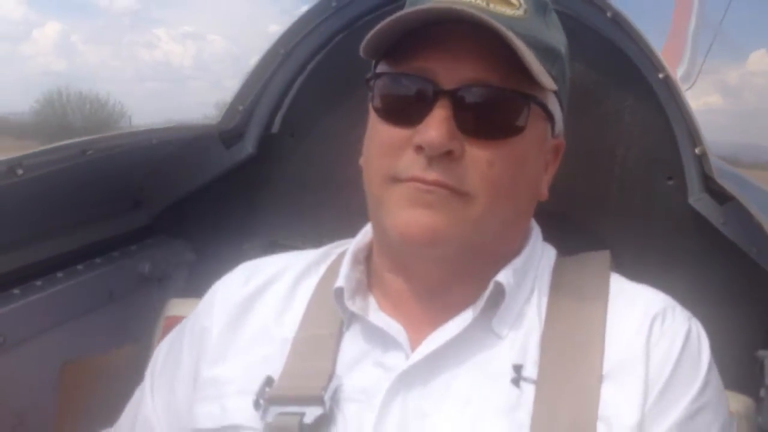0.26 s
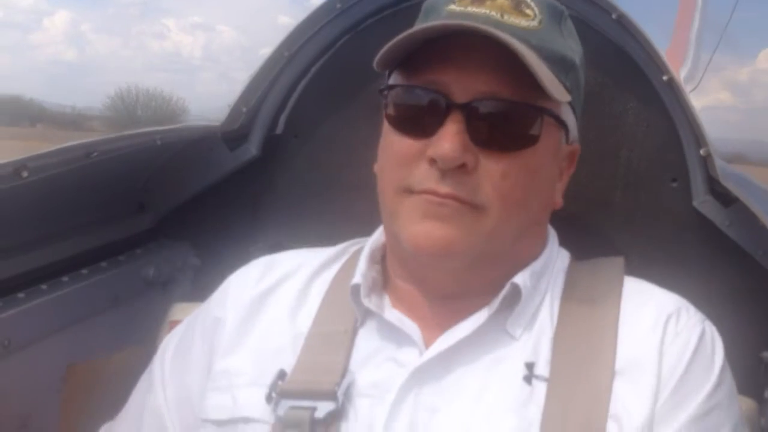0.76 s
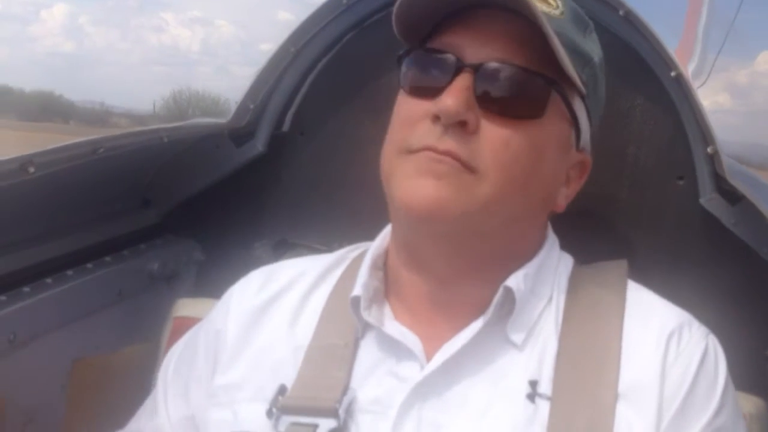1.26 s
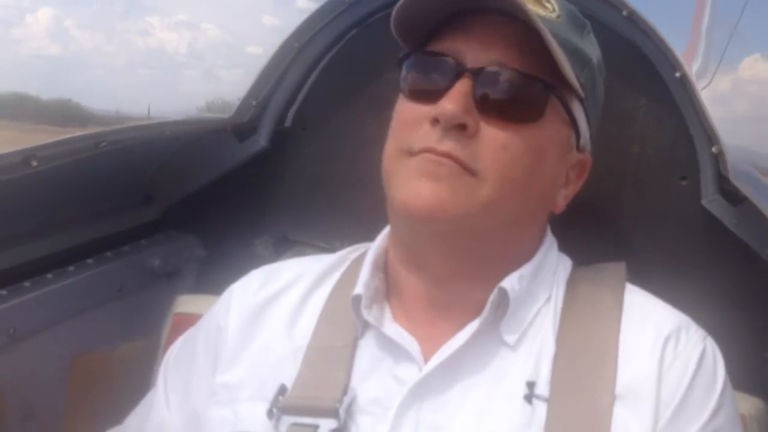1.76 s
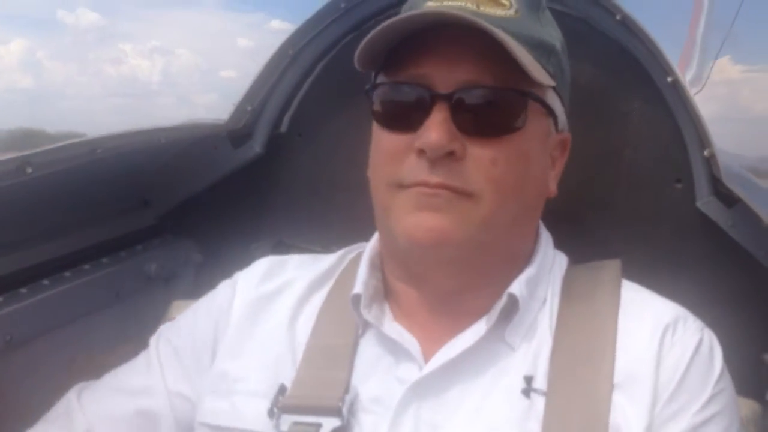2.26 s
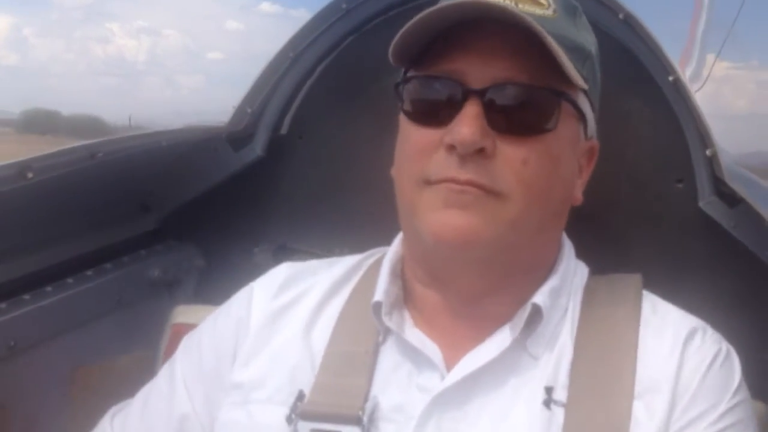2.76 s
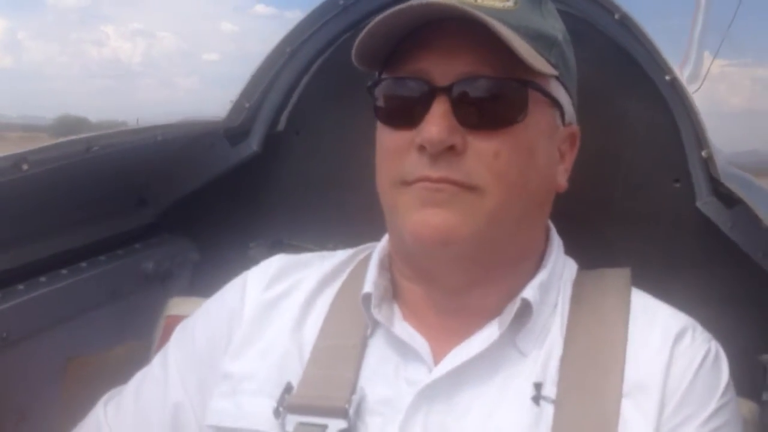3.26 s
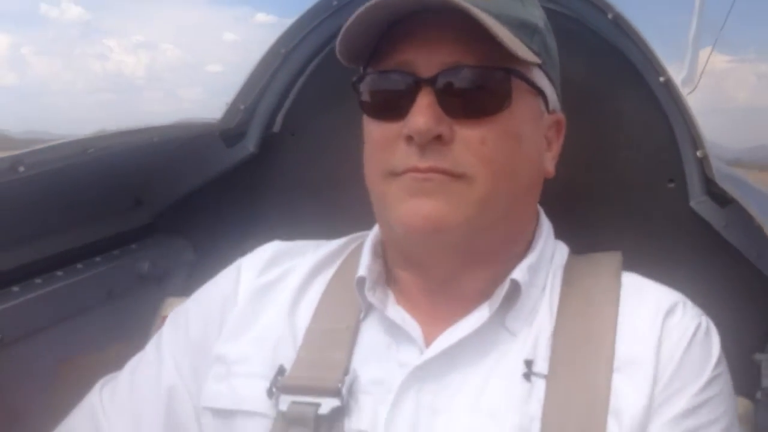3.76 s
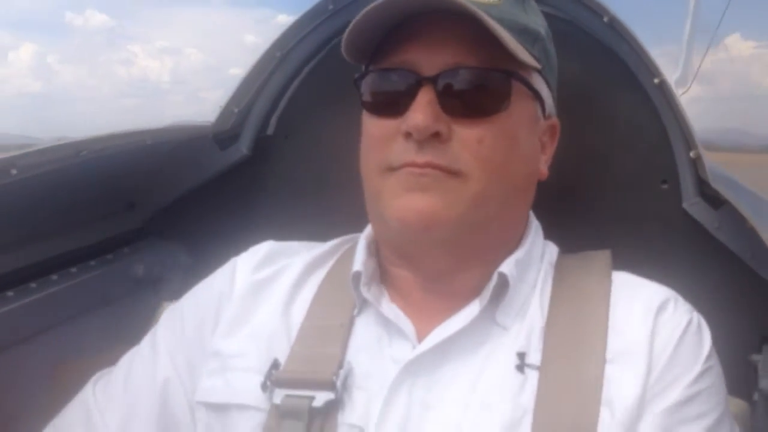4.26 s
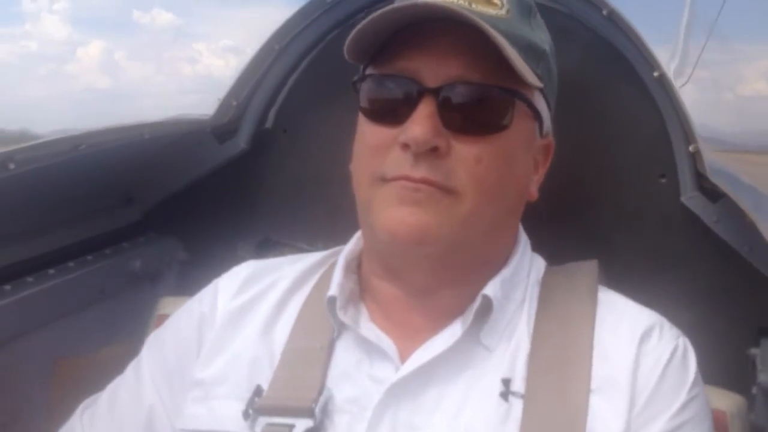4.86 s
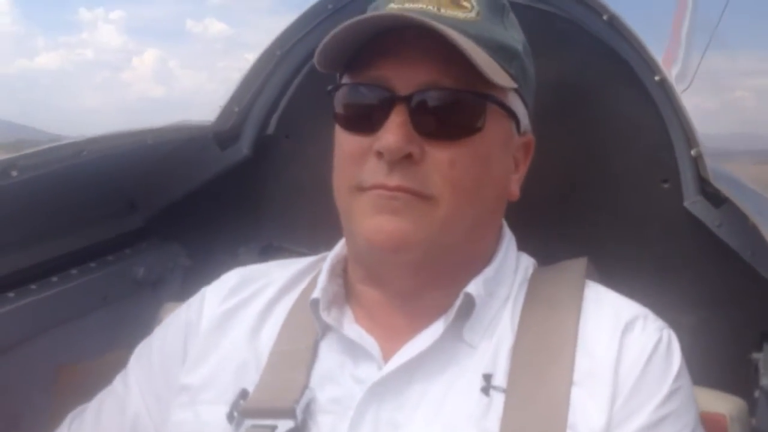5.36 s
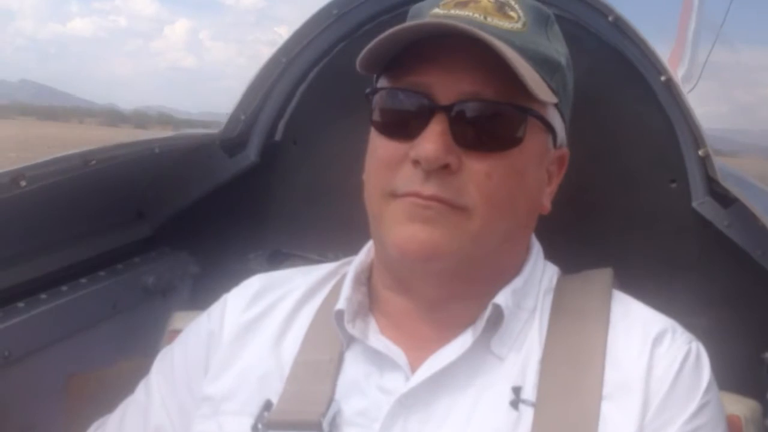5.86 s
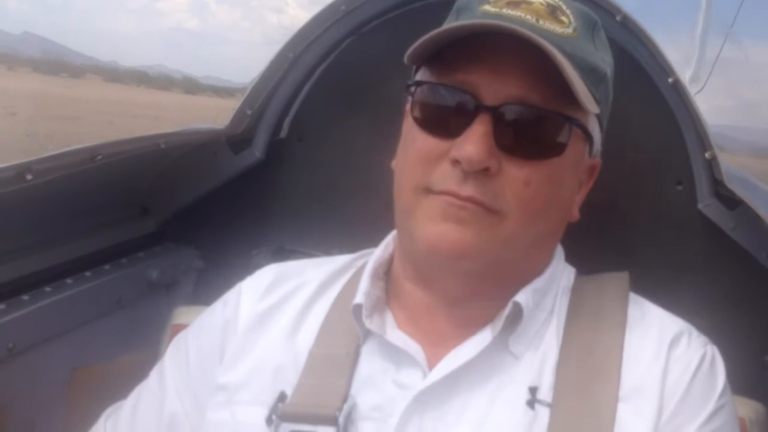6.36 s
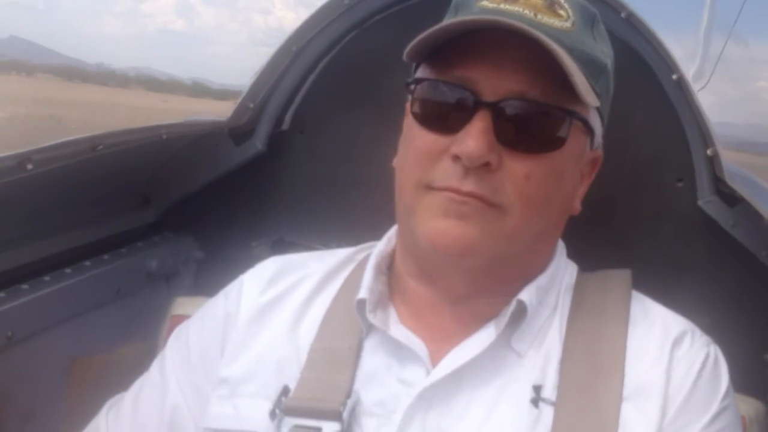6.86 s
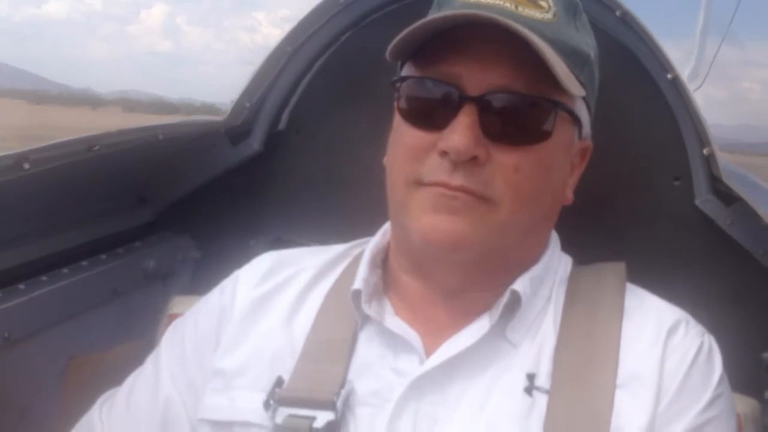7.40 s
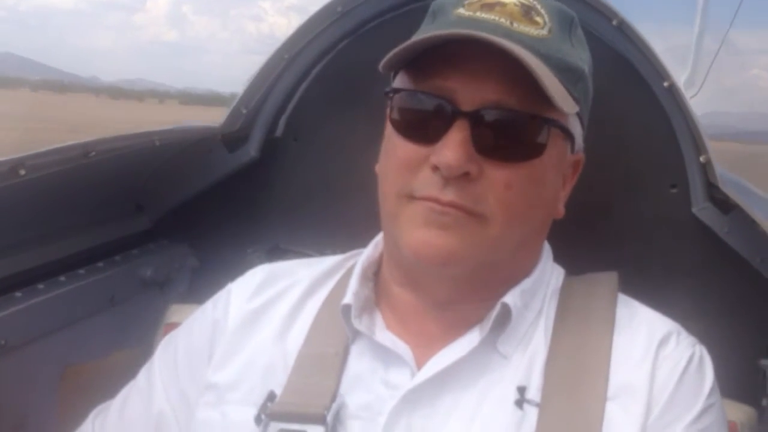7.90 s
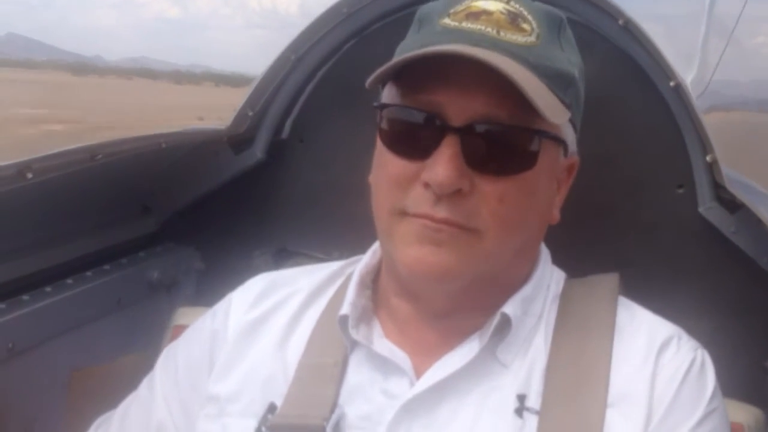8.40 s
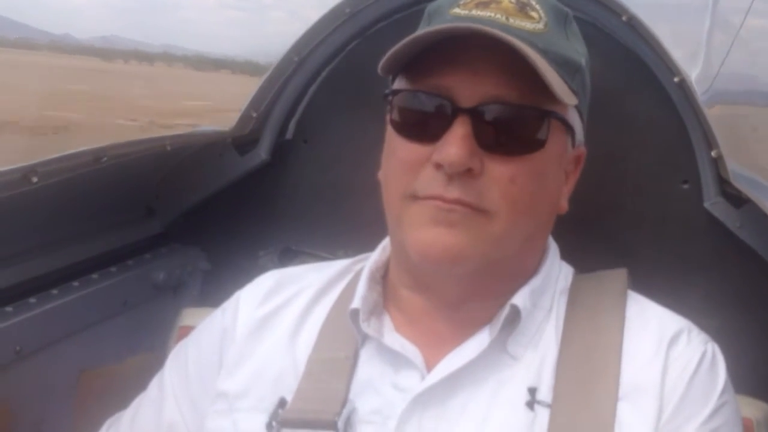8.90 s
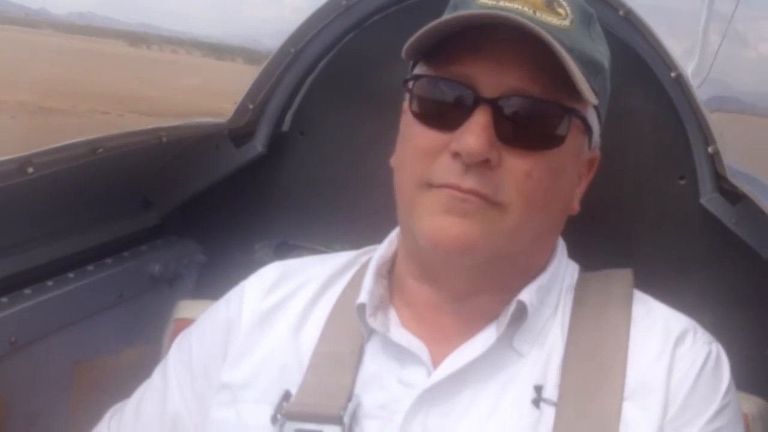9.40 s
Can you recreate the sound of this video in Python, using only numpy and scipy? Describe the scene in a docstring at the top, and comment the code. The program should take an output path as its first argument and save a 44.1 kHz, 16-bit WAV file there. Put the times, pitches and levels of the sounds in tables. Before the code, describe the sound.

Heard close up inside a glider cockpit. From 0 s a loud, low, hollow rumble is already under way as the wheel drums the fuselage over rough dirt, surging unevenly with each bump, over gritty grinding. In the first four seconds there are light buckle taps, sparse metallic rattles and faint very deep thumps, the strongest near 2.1 s. From about 4.1 s stony ground brings dense, bright clattering of canopy and fittings, and the panels sound harsher as the deepest bass thins. A hard cracking bang rings the frame at 4.8 s, a duller heavy jolt at 6.4 s, another at 7.7 s amid sharp rattles. At 8 s the rumble and grinding stop abruptly. Much quieter low buffeting air with a soft hiss continues to about 9.6 s, with dull hollow airframe clunks near 8.2, 8.7 and 8.8 s and a faint one at 9.1 s.

```python
"""A glider's wheel drums the hollow fuselage on a takeoff roll over rough dirt, heard in the cockpit.
Random impacts ring the hull and panels; shaped noise makes the grinding grit and the rushing air.
Fittings rattle in short noise bursts, smooth pulses make faint, very deep thumps, and three jolts
bang and ring the frame. Near 8 s the wheel leaves the ground: the rumble stops, the airframe clunks
and air rushes past."""
import sys
import numpy as np
from scipy import signal
from scipy.fft import rfft, irfft, next_fast_len
from scipy.io import wavfile
from scipy.ndimage import uniform_filter1d, minimum_filter1d, map_coordinates

SR = 44100
rng = np.random.default_rng(int(sys.argv[2]) if len(sys.argv) > 2 else 0)


def put_to_file(sound):
    """Save the sound as 16-bit audio at rate SR, in the file named by the first command-line argument."""
    columns = np.atleast_2d(sound).T  # one column per channel
    safe = np.clip(columns, -1, 1)
    whole_steps = np.round(safe * 32767)
    wavfile.write(sys.argv[1], SR, whole_steps.astype(np.int16))


N = 425124


def amp(db):
    """Turn decibels into a gain."""
    return 10 ** (np.asarray(db) / 20)


def unit(x):
    """Scale to an average (rms) strength of 1."""
    return x / np.sqrt(np.mean(x ** 2) + 1e-20)


def curves(rows):
    """Join the rows with straight lines over time: one curve for each column after the first."""
    s, *columns = np.transpose(rows)
    return [np.interp(np.arange(N) / SR, s, column) for column in columns]


def wobble(rate):
    """A smooth random curve through `rate` random points a second."""
    points = rng.standard_normal(int(N * rate / SR) + 4)
    return map_coordinates(points, [np.arange(N) * rate / SR])


def filtered(x, response):
    """Multiply each frequency of x by response(hz)."""
    size = next_fast_len(len(x) + 8192)  # spare room for the filter's tail
    hz = np.fft.rfftfreq(size, 1 / SR)
    return irfft(rfft(x, size) * response(hz), size)[:len(x)]


def spectrum_gain(spectrum, hz):
    """Gain at each frequency, read between the (pitch_hz, level_db) points on a log pitch scale."""
    pitch_hz, level_db = np.transpose(spectrum)
    return amp(np.interp(np.log(hz + 1), np.log(pitch_hz), level_db))


def coloured(x, spectrum):
    """Shape the tone of x with a spectrum, then scale it to rms 1."""
    return unit(filtered(x, lambda hz: spectrum_gain(spectrum, hz)))


def recoloured(spectrum, scatter_db):
    """Nudge each level of a spectrum at random, so that no two contacts sound alike."""
    return [(hz, db + scatter_db * rng.standard_normal()) for hz, db in spectrum]


def resonate(x, modes):
    """Ring x through resonances given as (pitch_hz, width_hz, level_db)."""
    def response(f):
        total = 0
        for k, (hz, width, db) in enumerate(modes):
            peak = 1j * f * width / (hz * hz - f * f + 1j * f * width)
            total = total + (-1) ** k * amp(db) * peak  # neighbours have opposite signs
        return total
    return filtered(x, response)


def grains(rate, spread_db):
    """Single-sample impacts at random times, about `rate` a second, of uneven size and random sign."""
    hits = rng.random(N) < rate / SR
    size_db = spread_db * np.clip(rng.standard_normal(N), -2, 2)
    return hits * rng.choice([-1, 1], N) * amp(size_db)


def patter(rate, spread_db, t60):
    """Loudness curve of many small random contacts, each falling 60 dB in t60 seconds."""
    fade = amp(-60 * np.arange(SR // 8) / SR / t60)
    power = signal.fftconvolve(grains(rate, spread_db) ** 2, fade ** 2)[:N]
    return np.sqrt(np.abs(power))


def burst(spectrum, attack, t60, size=6000):
    """One contact: shaped noise that rises over about `attack` seconds and falls 60 dB in t60 seconds."""
    t = np.arange(size) / SR
    gain = spectrum_gain(spectrum, np.fft.rfftfreq(size, 1 / SR))
    noise = unit(irfft(rfft(rng.standard_normal(size)) * gain))
    return noise * (1 - np.exp(-t / attack)) * amp(-60 * t / t60)


def steadied(x, share, size=3000):
    """Even out a share of x's chance surges, so that the ground sets its swells."""
    power = uniform_filter1d(uniform_filter1d(x ** 2, size=size), size=size)
    return unit(x / (np.abs(power) + 1e-9) ** (np.clip(share, 0, 1) / 2))


def add(track, s, sound):
    """Mix a sound into the track at time s."""
    part = track[max(round(s * SR), 0):][:len(sound)]
    part += sound[:len(part)]


def swell(middle, length):
    """A smooth rise from 0 to 1 and back; middle and length are in seconds."""
    out = np.zeros(N)
    size = max(round(length * SR), 3)
    add(out, middle - length / 2, np.hanning(size))
    return out


def speed(liftoff=8):
    """Share of flying speed: a steady climb from 0 to 1 at liftoff (s)."""
    return np.clip(np.arange(N) / SR / liftoff, 0, 1)


def with_speed(level):
    """Level in dB of a sound that grows as the glider gathers speed."""
    start_db, gained_db = level
    return start_db + gained_db * speed()


def on_ground(liftoff=8.02, release=0.16):
    """Ground contact: 1 while rolling, falling to 0 at liftoff as the wings take the weight."""
    return np.clip((liftoff - np.arange(N) / SR) / release, 0, 1)


# swells in the strip that press on the wheel: middle_s, length_s, hull_change_db, panel_change_db
BUMP_SWELLS = [(0.137, 0.11, 3, -3.5), (0.243, .1, -1, 5.5), (0.538, 0.082, 6, 7), (0.847, 0.4, 4, 1.5),
               (1.151, 0.19, 8.5, 2), (1.273, 0.25, 3, 4), (1.471, 0.3, 5.5, 2), (1.679, 0.15, 4, 0.5),
               (2.066, 0.35, 4.5, 3.5), (2.454, 0.38, 1.5, 3), (2.612, 0.15, 4.5, 5), (2.738, 0.15, 4.5, 5),
               (2.904, 0.19, 7, 3.5), (3.141, 0.096, 8.5, 2.5), (3.635, 0.34, 3, 4), (3.718, 0.054, 7, 2),
               (4.011, 0.21, 6.5, 3.5), (4.208, 0.082, 7, 3), (4.532, 0.42, 2, 5), (4.817, 0.26, -1, 5),
               (5.2, 0.33, 0, 3.5), (5.417, 0.33, -2, 5.5), (5.647, 0.32, 4.5, 2), (5.905, 0.24, 0, 3.5),
               (6.496, 0.22, 4, -0.5), (6.924, 0.34, 4, 0), (7.211, 0.11, 6.5, 5.5), (7.677, 0.1, -5.5, 3),
               (7.773, 0.11, 4, 3)]
# hollows where the wheel goes light: middle_s, length_s, loss_db
WHEEL_HOLLOWS = [(0.39, 0.081, 2.5), (2.466, 0.055, 5), (3.42, 0.11, 1.5), (3.891, 0.2, 2.5),
                 (4.277, 0.046, 4), (4.775, 0.19, 1.5), (7.155, 0.21, 4), (7.466, 0.29, 2)]


def wheel_load():
    """How bumps and hollows change the drive on the hull and on the panels, as two curves in dB."""
    load_db = np.zeros((2, N))
    for middle, length, hull_db, panel_db in BUMP_SWELLS:
        load_db += np.outer([hull_db, panel_db], swell(middle, length))
    for middle, length, loss_db in WHEEL_HOLLOWS:
        load_db -= loss_db * swell(middle, length)
    return load_db


# stretches of stony ground: start_s, end_s, stoniness (share, 0 to 1)
STONY_STRETCHES = [(4.11, 4.587, 0.87), (4.708, 5.356, 0.7), (5.545, 5.88, .35), (6.171, 6.458, 1),
                   (6.592, 6.829, 1), (6.921, 7.037, 0.8), (7.648, 7.976, .75)]


def stoniness(edge=0.031):
    """0 on plain dirt, up to 1 on stones; each stretch fades in and out over `edge` seconds."""
    t = np.arange(N) / SR
    stones = np.zeros(N)
    for start, end, share in STONY_STRETCHES:
        stones += share * np.clip(np.minimum(t - start, end - t) / edge + .5, 0, 1)
    return stones


# air over the canopy, before gusts and the slow-speed cut: time_s, buffet_db, hiss_db
AIR_LEVELS = [(8.0, -30, -42), (8.25, -30.5, -40.5), (8.44, -32.5, -39.5), (8.66, -33.5, -45),
              (8.8, -29, -37.5), (8.97, -30.5, -41.5), (9.12, -31.5, -38), (9.22, -32, -40),
              (9.64, -30, -37.3)]
# tone of the low buffeting: pitch_hz, relative_db
BUFFET_TONE = [(20, -44.5), (50, -32), (80, -17), (120, -4), (170, 1), (280, -2), (380, -8.5), (480, -8.5),
               (800, -25), (2000, -53.5), (6000, -80)]
# tone of the air hiss: pitch_hz, relative_db
HISS_TONE = [(50, -46), (200, 2), (500, -0.5), (850, 4), (1300, -3), (2100, -9.5), (3200, -18.5),
             (4900, -25.5), (5600, -32.5), (7000, -37.5), (9500, -47.5), (15000, -41.5)]


def airflow(slow_db=-26):
    """Air buffets the canopy and hisses at its seams: two shaped noises that grow during the roll."""
    buffet_db, hiss_db = curves(AIR_LEVELS)
    gust_db = .7 * wobble(12)
    buffet = coloured(rng.standard_normal(N), BUFFET_TONE) * amp(buffet_db + gust_db)
    hiss = coloured(rng.standard_normal(N), HISS_TONE) * amp(hiss_db + gust_db / 2)
    return (buffet + hiss) * amp(slow_db * (1 - speed()))


# airframe and control runs clunking: start_s, level_db, fade_s (60 dB), pitch_hz, ring_relative_db
CLUNK_EVENTS = [(8.003, -41.5, 0.096, 1380, 10), (8.195, -36.5, 0.3, 600, 2.5),
                (8.714, -32.5, .3, 1870, -6), (8.834, -34.5, 0.52, 566, 1.5),
                (9.125, -43.5, .25, 1430, 1.5)]
# tone of the knock itself: pitch_hz, relative_db
CLUNK_TONE = [(50, -50), (150, -10.5), (550, 3), (900, -5.5), (1800, -4), (2900, -6.5), (4000, -17.5),
              (6500, -26.5), (9000, -41), (15000, -38.5)]
# frame resonances that answer each clunk: pitch_hz, width_hz, relative_db
AIRFRAME_MODES = [(804, 37, 0), (1070, 59, 7), (1790, 49, -13), (2650, 60, -8), (3180, 110, -14),
                  (3970, 78, -23)]


def clunks(width_hz=110, knock_db=-1.5, airframe_db=-4):
    """Dull airframe knocks from liftoff on: a burst, one hollow resonance and the frame's ring."""
    out = np.zeros(N)
    for s, db, t60, hz, ring_db in CLUNK_EVENTS:
        knock = burst(CLUNK_TONE, attack=0.0032, t60=t60, size=16000)
        strength = np.std(knock)
        ring = unit(resonate(knock, [(hz, width_hz, 0)])) * strength
        frame = unit(resonate(knock, AIRFRAME_MODES)) * strength
        mix = amp(knock_db) * knock + amp(ring_db) * ring + amp(airframe_db) * frame
        add(out, s, amp(db) * mix)
    return out


# how hard small fittings are shaken, before bumps and stones: time_s, level_db
SHAKE_LEVELS = [(0, -80.5), (.45, -82.5), (.7, -79), (2, -71), (3.1, -67.5), (4, -71.5), (6, -72.5),
                (8, -69)]
# tone of the small ticks: pitch_hz, relative_db
TICK_TONE = [(200, -58), (1000, -18), (2500, -7), (3500, -12.5), (4700, -4), (5400, -16), (7000, -19.5),
             (10000, -29), (15000, -20)]
# bright metal tone, also used by the rattles: pitch_hz, relative_db
CLINK_TONE = [(300, -62.5), (1500, -9), (4000, 4.5), (5500, 3), (7500, 0), (10000, -4.5), (12500, 0),
              (14800, 2), (16000, -7.5)]


def chatter(load_db, stones, load_share=1.3, stony_db=9, buzz_db=-64):
    """Small fittings tick, harder under load; on stones the canopy buzzes in its frame."""
    ticks = unit(coloured(rng.standard_normal(N), TICK_TONE) * patter(rate=37, spread_db=2, t60=0.041))
    buzz = unit(coloured(rng.standard_normal(N), CLINK_TONE) * patter(rate=70, spread_db=0.5, t60=.06))
    tick_db = curves(SHAKE_LEVELS)[0] + load_share * load_db + stony_db * stones
    return ticks * amp(tick_db) + buzz * stones ** 2 * amp(buzz_db)


# duller knocking tone, also used by the rattles and jolts: pitch_hz, relative_db
CLACK_TONE = [(80, -49.5), (300, -15), (800, -3), (1900, 5), (2400, 0), (3400, -7), (4700, -9),
              (5800, -23.5), (10000, -30.5)]


def clatter(stones, clatter_db=-50):
    """Stones set off many lesser knocks of the canopy frame: noise under a pattering loudness."""
    knocks = unit(coloured(rng.standard_normal(N), CLACK_TONE) * patter(rate=39, spread_db=2.5, t60=0.095))
    return knocks * stones * amp(clatter_db)


# canopy and fittings clattering, before the trims below: start_s, level_db, body_relative_db
RATTLE_EVENTS = [(0.6697, -54, 24), (0.8055, -58, 17), (1.153, -44.5, 11.5), (1.4195, -47.5, 10),
                 (1.4836, -52, 16), (1.552, -50.5, 14.5), (2.051, -48.5, 16.5), (2.532, -51.5, 8.5),
                 (2.5523, -43.5, 2.5), (2.604, -41.5, 10), (2.758, -47, 11.5), (2.8575, -59, 20),
                 (3.0475, -48.5, 9), (3.157, -54, 17.5), (3.257, -45.5, -8), (3.6185, -55, 16.5),
                 (3.8437, -50.5, -5), (3.9814, -48, 11), (4.0928, -40.5, 9.5), (4.133, -44, 10),
                 (4.1886, -42.5, -0.5), (4.2107, -38, 2), (4.2426, -32, 10), (4.3018, -36, 2),
                 (4.341, -37, 10), (4.3837, -44.5, -9), (4.416, -44.5, 10.5), (4.4408, -37.5, 7.5),
                 (4.4893, -37, -7), (4.5242, -44, -4), (4.623, -43, 12.5), (4.7526, -47.5, 10.5),
                 (4.781, -42.5, -10), (4.797, -35.5, 8), (4.8419, -35.5, 0), (4.937, -37, 10.5),
                 (4.9618, -37.5, 3.5), (5.0567, -37, 3.5), (5.114, -40, 10.5), (5.1817, -40.5, -1),
                 (5.2116, -47, 5), (5.291, -32.5, -2), (5.3457, -47, -15), (5.5268, -40, 9),
                 (5.6344, -45.5, 13), (6.0438, -45, -0.5), (6.134, -42, 9), (6.162, -47.5, 11.5),
                 (6.189, -40, -4.5), (6.2172, -41.5, 10), (6.2346, -39.5, -1), (6.272, -45, -6),
                 (6.3141, -45.5, 4.5), (6.349, -39, 8), (6.388, -41, 7.5), (6.4218, -39.5, 14),
                 (6.5445, -40.5, 12.5), (6.6131, -41.5, -14), (6.6219, -34.5, 11), (6.6643, -35, 9.5),
                 (6.719, -38.5, 4), (6.765, -34.5, 3.5), (6.94, -38.5, 3.5), (6.978, -42.5, -3),
                 (7.02, -48.5, 9.5), (7.131, -42.5, -10.5), (7.147, -37, 9.5), (7.351, -47.5, 6.5),
                 (7.427, -42.5, 2), (7.4658, -39.5, 11), (7.6117, -46.5, 0.5), (7.666, -29, 2.5),
                 (7.6932, -32, 6), (7.8066, -33.5, 3.5), (7.9075, -41, 8.5), (7.9423, -40, 9),
                 (8.001, -43.5, 5.5), (8.2022, -48, 8.5), (8.838, -50, 0)]
# a small loose buckle tapping, before the trim below: start_s, level_db
BUCKLE_TAPS = [(0.537, -46.5), (0.807, -45.5), (0.958, -53), (1.1363, -41.5), (1.1616, -42.5),
               (1.1871, -43), (1.216, -50.5), (1.4688, -47.5), (1.6237, -48), (1.8399, -48), (1.9937, -46),
               (2.607, -45.5), (2.858, -44.5), (3.237, -46.5), (3.5521, -50.5), (3.707, -47.5),
               (3.816, -48), (3.942, -49), (4.024, -42.5)]
# tone of the buckle: pitch_hz, relative_db
BUCKLE_TONE = [(200, -59.5), (1000, -20), (2500, -7.5), (3500, -8.5), (4700, -1.5), (5500, -16),
               (7000, -23), (10000, -34.5), (15000, -26)]


def rattles(clink_db=-7, clack_db=-9, rebound_db=-8, tap_db=-3, flight=.016, count=2):
    """Metal fittings clink and clack on the canopy frame and rebound ever weaker; a buckle taps."""
    out = np.zeros(N)
    for s, db, body_db in RATTLE_EVENTS:
        clack_tone = recoloured(CLACK_TONE, scatter_db=2.2)
        add(out, s, amp(db + clink_db) * burst(CLINK_TONE, attack=0.0014, t60=0.1))
        add(out, s, amp(db + body_db + clack_db) * burst(clack_tone, attack=0.0011, t60=0.2))
        # rebounds follow after random gaps scaled from `flight` seconds
        delays = np.cumsum(flight * rng.uniform(0.39, 1.5, count))
        for k, delay in enumerate(delays, 1):
            rebound = burst(CLINK_TONE, attack=.001, t60=0.041)
            add(out, s + delay, amp(db + clink_db + k * rebound_db) * rebound)
    for s, db in BUCKLE_TAPS:
        add(out, s, amp(db + tap_db) * burst(BUCKLE_TONE, attack=.0005, t60=0.034))
    return out


# faint, very deep thumps during the roll, before the boost below: start_s, level_db
DEEP_THUMPS = [(1.448, -32), (1.544, -38.5), (1.792, -34), (2.04, -39), (2.118, -25.5), (2.63, -37),
               (2.928, -32), (3.151, -35), (3.55, -38), (3.612, -39), (3.709, -38), (4.841, -36),
               (5.216, -34), (5.758, -37), (6.18, -41.5), (6.6, -39), (7.02, -38), (7.77, -40)]


def deep_thumps(thump_db=9, pulse_s=0.011):
    """Faint, very deep thumps during the roll: each is one smooth pulse, timed by pulse_s."""
    out = np.zeros(N)
    u = np.arange(SR // 8) / SR / pulse_s
    pulse = u * (2 - u) * np.exp(-u)  # up, below zero, then back to rest
    for s, db in DEEP_THUMPS:
        add(out, s, amp(db + thump_db) * pulse)
    return out


# heavy undercarriage blows, before the trims below: start_s, level_db, crack_relative_db, struck_pitch_hz
# (the crack's level is relative to the blow, here 7 to 19.5 dB weaker)
JOLT_EVENTS = [(4.841, -16, -7, 1060), (6.421, -17, -19.5, 1950), (7.696, -20.5, -16, 1550)]
# what rings in a jolt: pitch_hz, relative_db, fade_s (60 dB)
FRAME_MODES = [(600, 0, 0.066), (785, 5.5, 0.065), (880, 7, 0.078), (1000, 3.5, 0.085), (1138, -3.5, .11),
               (1324, -4.5, 0.18), (1642, -5, 0.12), (1802, -6.5, 0.11), (1973, -4.5, 0.1),
               (2450, -10, 0.12), (2950, -9.5, 0.074), (4260, -13, .05), (5800, -26, 0.063)]
# tone of the bang: pitch_hz, relative_db
BANG_TONE = [(40, -43), (150, -5), (600, -10.5), (1100, 5.5), (2000, -6), (3000, -18), (5000, -32),
             (9000, -45), (15000, -44)]
# deep tone of the thump, also used by the rumble: pitch_hz, relative_db
TYRE_TONE = [(20, -19), (55, -15), (80, -13), (100, -8.5), (125, -2.5), (220, -1.5), (300, -5.5),
             (600, -9.5), (2000, -53)]


def jolts(ring_db=-4, bang_db=-3, focus_db=7.5, thump_db=2):
    """Hard bumps slam the undercarriage: fading sines ring the frame; bursts crack, bang and thump."""
    out = np.zeros(N)
    t = np.arange(SR // 4) / SR
    for s, db, crack_relative_db, struck_hz in JOLT_EVENTS:
        for hz, level, t60 in FRAME_MODES:
            # where the blow lands decides which modes take most of it (focus_db per octave)
            octaves_away = abs(np.log2(hz / struck_hz))
            mode_db = level - focus_db * octaves_away + rng.normal(0, 1)
            ring = amp(mode_db - 60 * t / t60) * np.sin(2 * np.pi * (hz * t + rng.random()))
            add(out, s, amp(db + ring_db) * ring * (1 - np.exp(-t / 0.0019)))
        add(out, s, amp(db + bang_db) * burst(BANG_TONE, attack=.003, t60=.1))
        add(out, s, amp(db + crack_relative_db) * burst(CLACK_TONE, attack=.0005, t60=0.07))
        add(out, s, amp(db + thump_db) * burst(TYRE_TONE, attack=0.0032, t60=0.08))
    return out


# tone of the grit: pitch_hz, relative_db
GRIT_TONE = [(60, -41.5), (200, -16.5), (600, 5), (1000, 2.5), (1400, -3.5), (1950, -12.5), (2500, -20),
             (3500, -28), (5000, -35), (8000, -45.5), (15000, -53.5)]
# grit level before load and stones: start_db, gained_by_liftoff_db
GRIT_GROWTH = (-42.5, 5.55)


def dirt(load_db, stones, load_share=0.71, stony_db=4.5):
    """The tyre grinds grit in uneven crunches of shaped noise, harder under load and on stones."""
    noise = coloured(rng.standard_normal(N), GRIT_TONE)
    grit = unit(noise * patter(rate=220, spread_db=1.0, t60=0.15))
    return grit * amp(with_speed(GRIT_GROWTH) + load_share * load_db + stony_db * stones)


# fuselage shell and cockpit cavity, before the tyre tone: pitch_hz, width_hz, relative_db
HULL_MODES = [(134.9, 24.2, -1), (177.2, 12, 2.5), (213.9, 20, 0)]
# skin panels, before the skin tone: pitch_hz, width_hz, relative_db
PANEL_MODES = [(255.7, 18.9, -3.5), (282.5, 11.2, -1.5), (315.7, 12.9, 1.5), (416, 118.6, -11),
               (464.7, 42.4, -8.5), (611, 70.5, -16), (728, 13, -10), (809, 41.6, -18)]
# tone of the panels: pitch_hz, relative_db
SKIN_TONE = [(60, -25.5), (180, -9.5), (260, 2), (800, -4), (1100, -1.5), (2000, -17), (5000, -45)]
# how much the rumble's deepest bass is thinned: time_s, thinning (share, 0 to 1)
DEEP_BASS_LOSS = [(0, 0), (.7, .05), (1.25, .6), (2, .1), (3.2, .05), (4.2, 0.7), (5.2, 1), (6.2, .8),
                  (7.3, .6), (8, 0.8)]
# hull level before wheel load: start_db, gained_by_liftoff_db
HULL_GROWTH = (-16.5, 0)
# panel level before wheel load: start_db, gained_by_liftoff_db
PANEL_GROWTH = (-23, 6.85)


def rumble(load_db, tilt=0.77):
    """Stones and clods under the tyre drum the shell and panels: random impacts ring their resonances."""
    hull_load_db, panel_load_db = load_db
    full = coloured(resonate(grains(rate=900, spread_db=2), HULL_MODES), TYRE_TONE)
    # a copy with weaker bass below 220 Hz, blended in as the deep bass thins
    thin = unit(filtered(full, lambda hz: (np.clip(hz, 60, 220) / 220) ** tilt))
    loss = np.clip(curves(DEEP_BASS_LOSS)[0], 0, 1)
    hull = steadied((1 - loss) * full + loss * thin, share=0.85)
    panel_ring = resonate(grains(rate=1500, spread_db=1.5), PANEL_MODES)
    panels = steadied(coloured(panel_ring, SKIN_TONE), share=0.38)
    hull_gain = amp(with_speed(HULL_GROWTH) + hull_load_db)
    panel_gain = amp(with_speed(PANEL_GROWTH) + panel_load_db)
    return hull_gain * hull + panel_gain * panels


def scene():
    """Mix the cockpit: the steady rolling sounds stop at liftoff, the others keep their own times."""
    load_db, stones = wheel_load(), stoniness()
    mean_load_db = load_db.mean(axis=0)
    rolling = chatter(mean_load_db, stones) + clatter(stones)
    rolling += dirt(mean_load_db, stones) + rumble(load_db)
    return (airflow() + clunks() + rattles() + deep_thumps() + jolts() + on_ground() * rolling)[None]


def record(dry, noise_db=-80, ceiling=.7, top_hz=15500):
    """Fade in briefly, add a faint hiss, limit the peaks and cut everything from top_hz up."""
    fade_in = np.minimum(1, np.arange(N) / 200)
    sound = dry[0] * fade_in + amp(noise_db) * rng.standard_normal(N)
    needed = np.minimum(1, ceiling / (np.abs(sound) + 1e-9))
    # hold the lowest gain around each peak, then smooth it
    gain = uniform_filter1d(minimum_filter1d(needed, size=300), size=300)
    return filtered(sound * gain, lambda hz: hz < top_hz)[None]


dry = scene()
out = record(dry)
put_to_file(out)
```